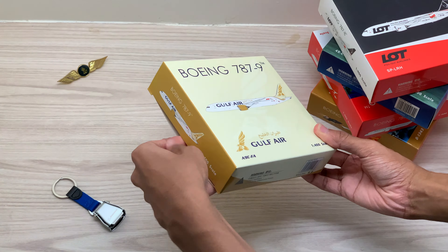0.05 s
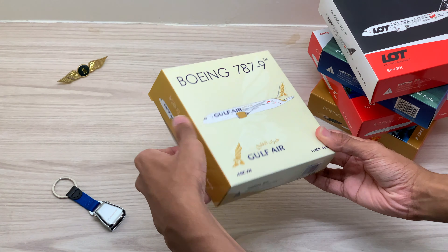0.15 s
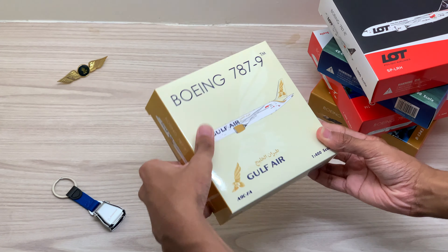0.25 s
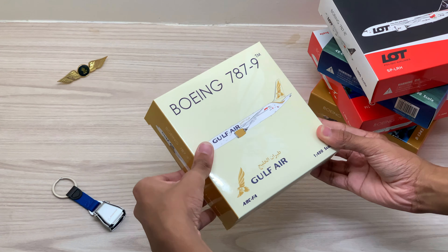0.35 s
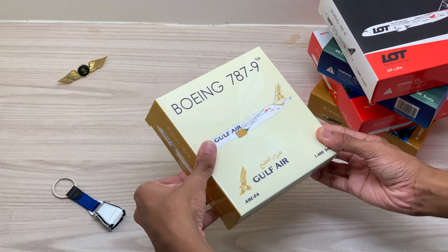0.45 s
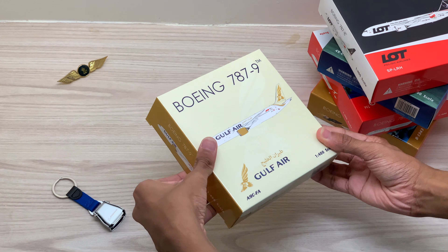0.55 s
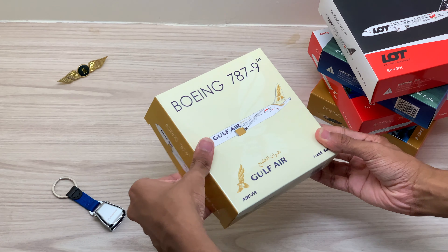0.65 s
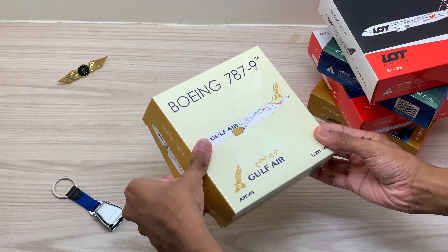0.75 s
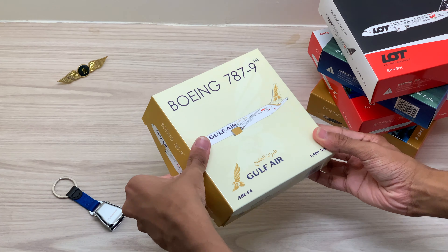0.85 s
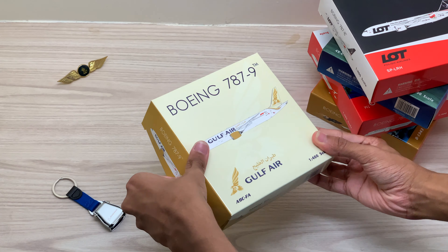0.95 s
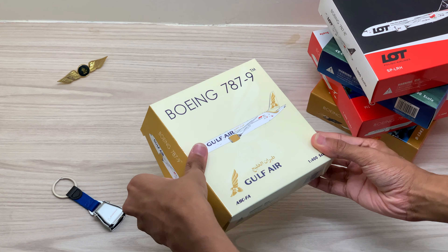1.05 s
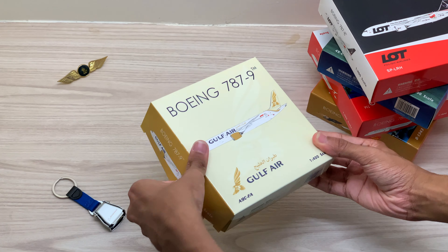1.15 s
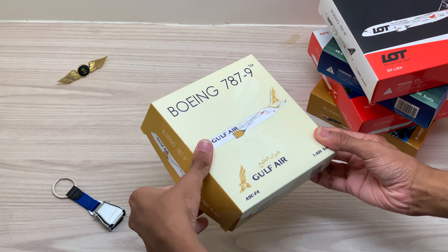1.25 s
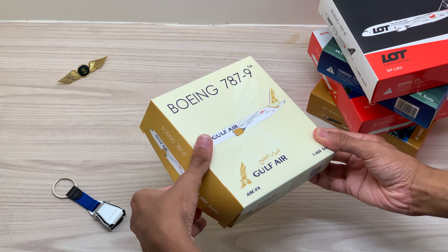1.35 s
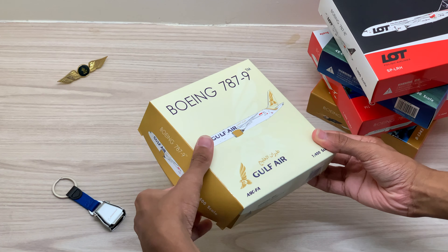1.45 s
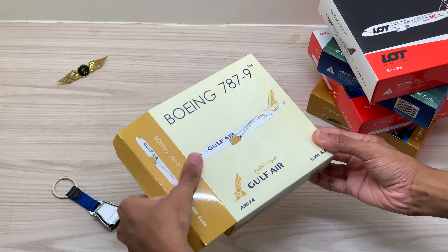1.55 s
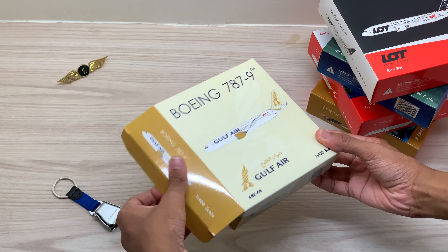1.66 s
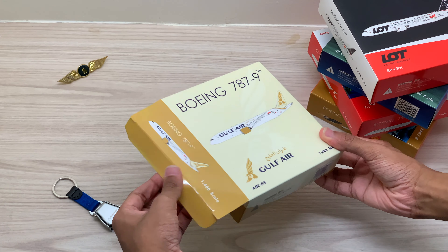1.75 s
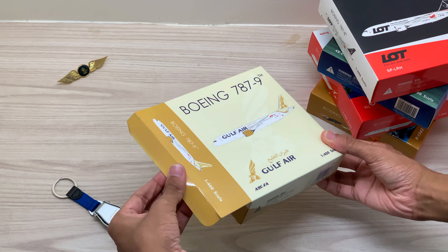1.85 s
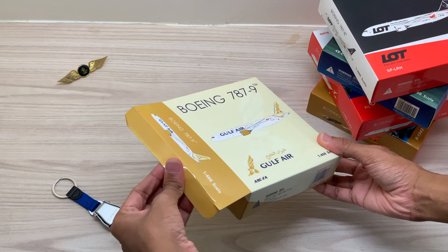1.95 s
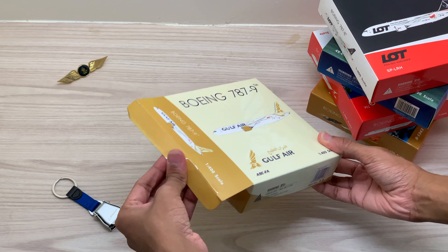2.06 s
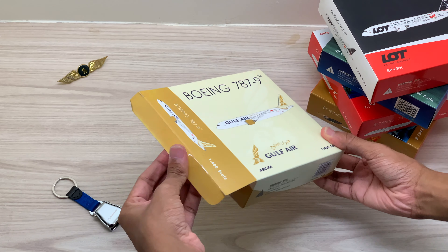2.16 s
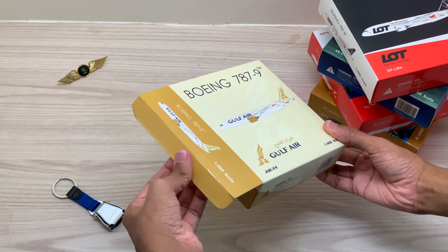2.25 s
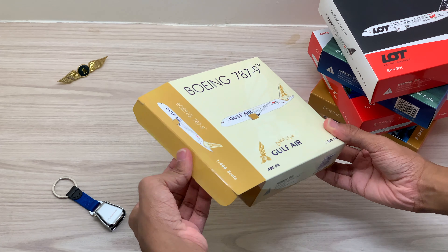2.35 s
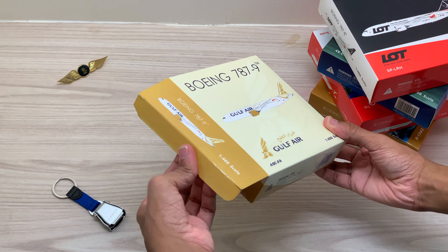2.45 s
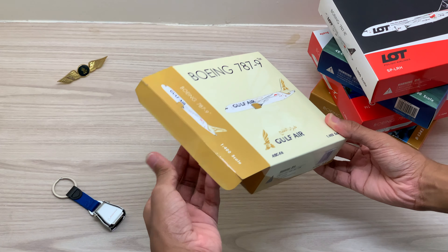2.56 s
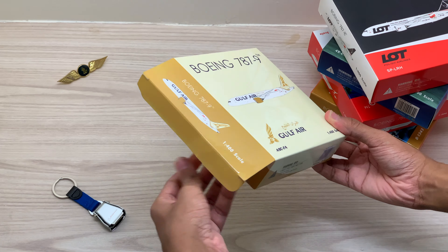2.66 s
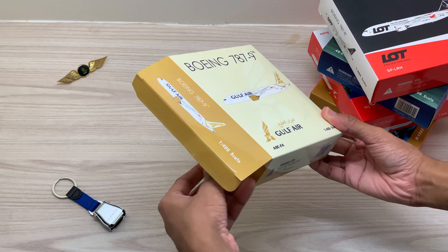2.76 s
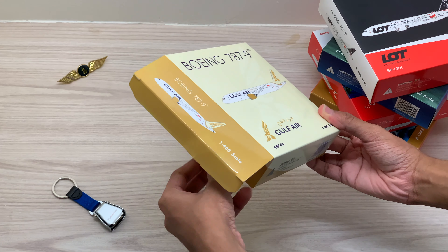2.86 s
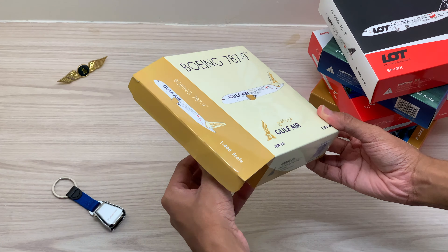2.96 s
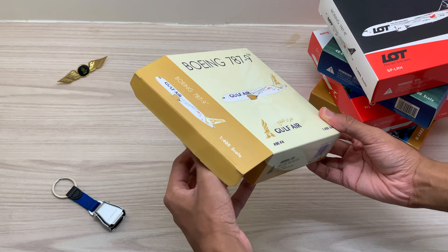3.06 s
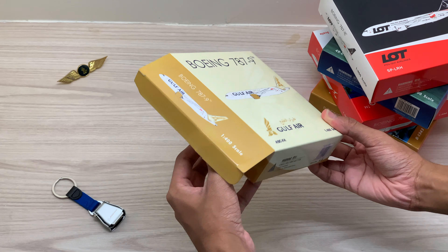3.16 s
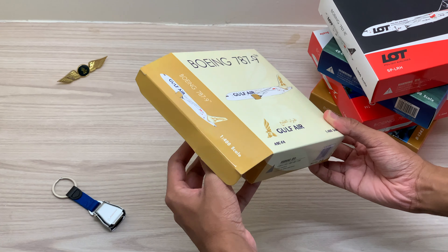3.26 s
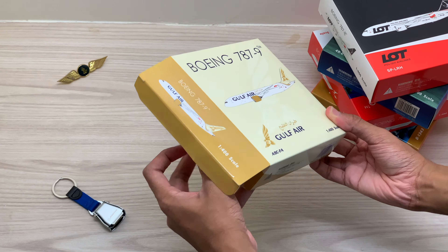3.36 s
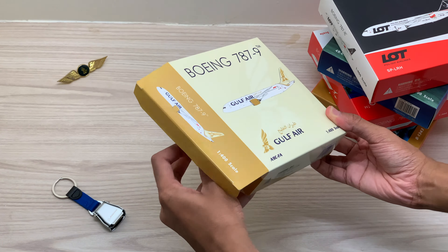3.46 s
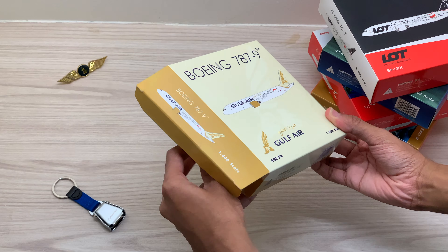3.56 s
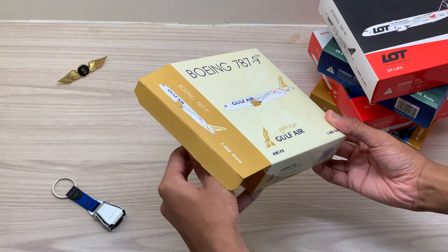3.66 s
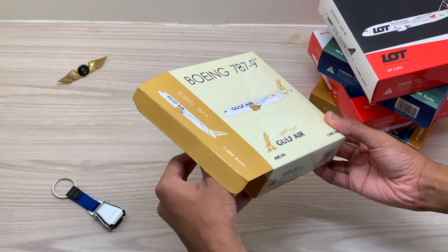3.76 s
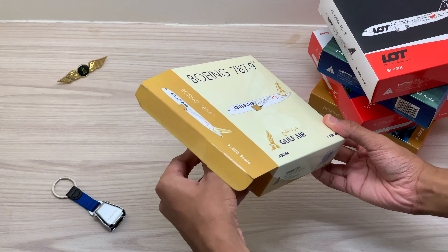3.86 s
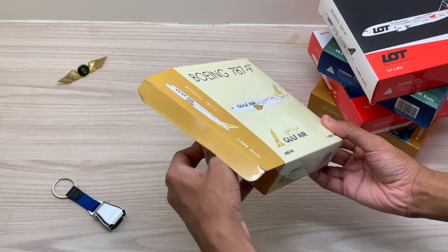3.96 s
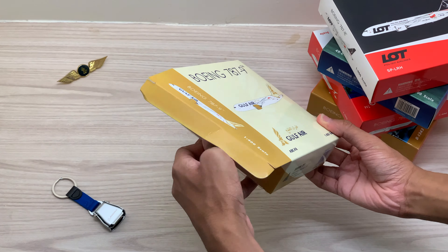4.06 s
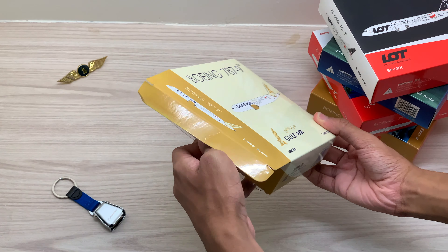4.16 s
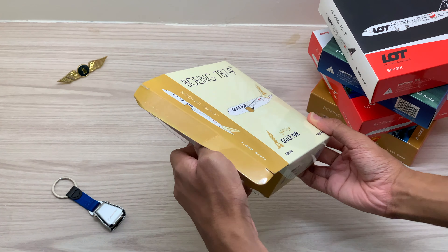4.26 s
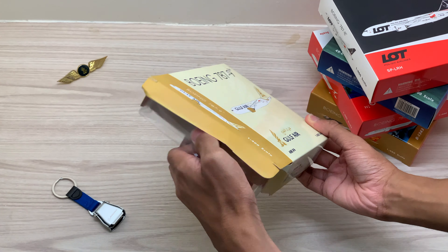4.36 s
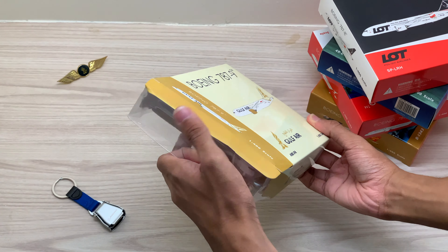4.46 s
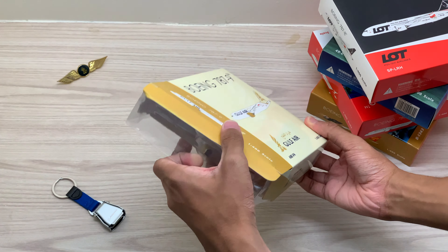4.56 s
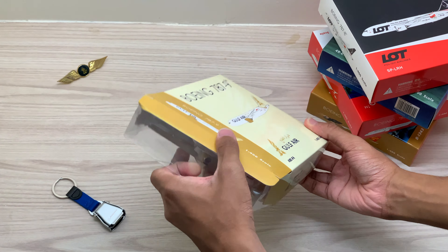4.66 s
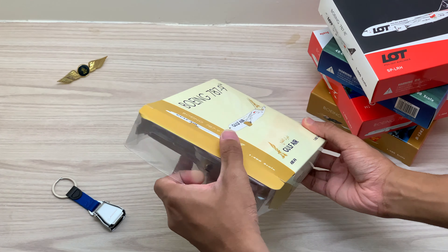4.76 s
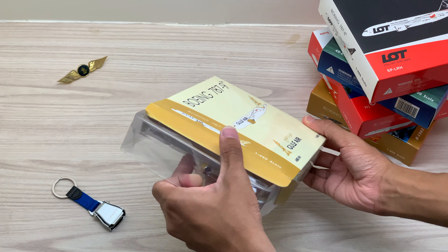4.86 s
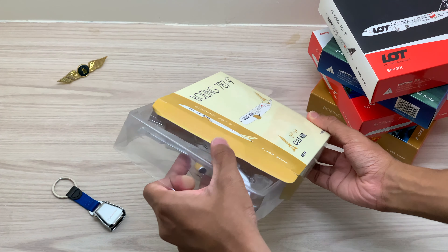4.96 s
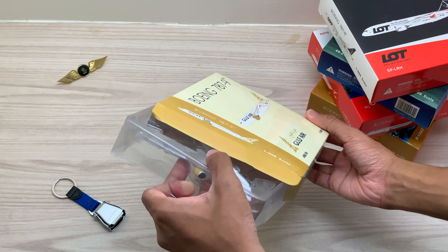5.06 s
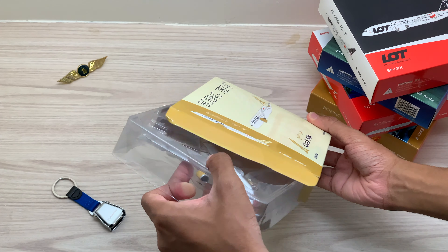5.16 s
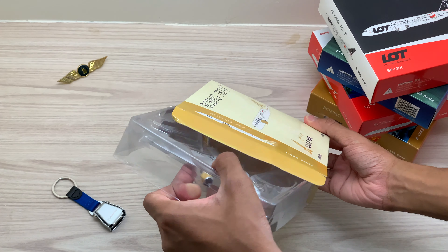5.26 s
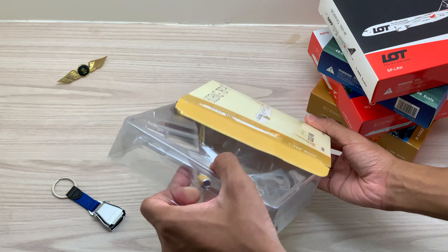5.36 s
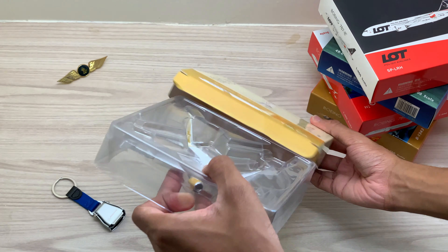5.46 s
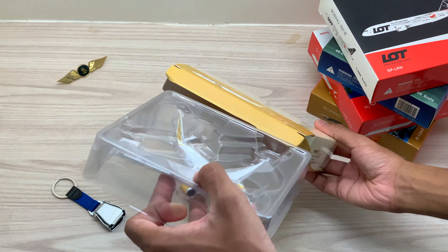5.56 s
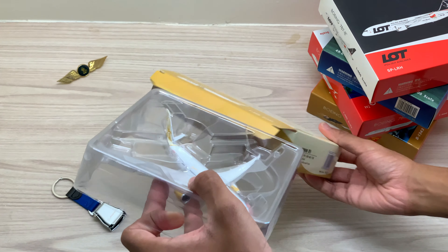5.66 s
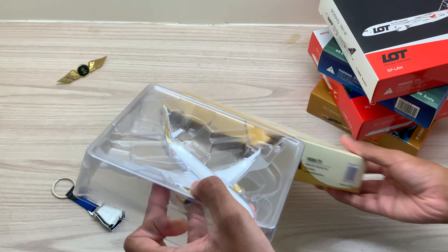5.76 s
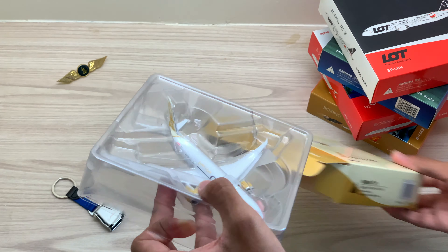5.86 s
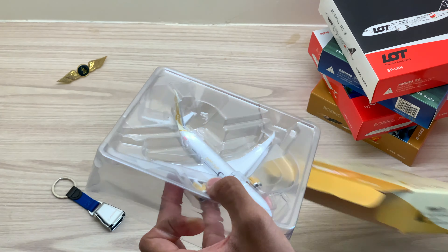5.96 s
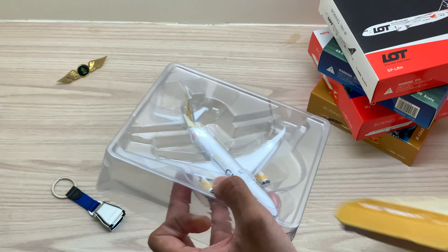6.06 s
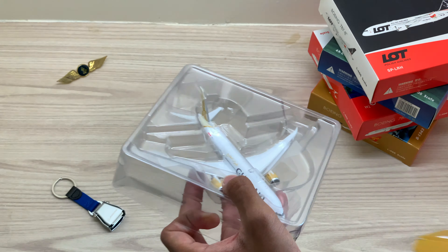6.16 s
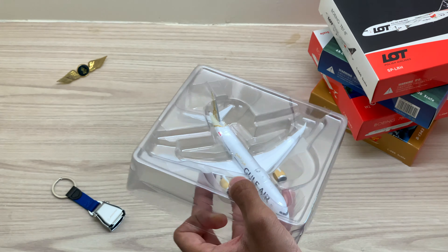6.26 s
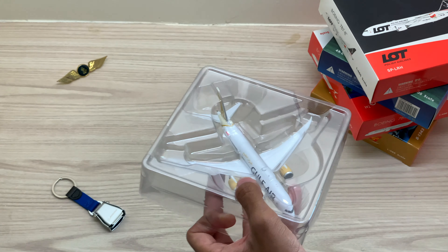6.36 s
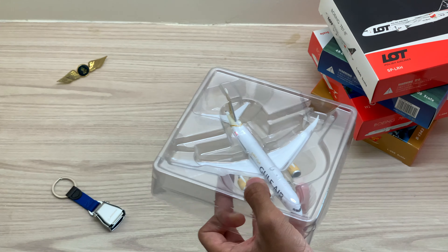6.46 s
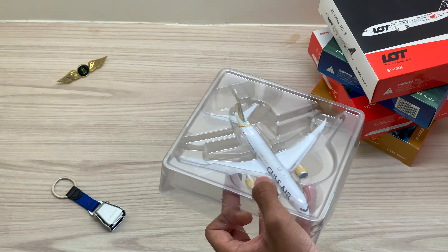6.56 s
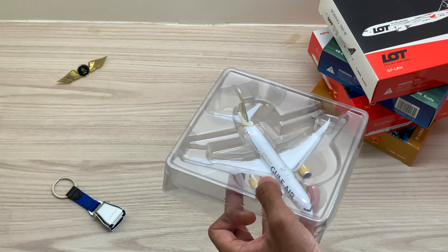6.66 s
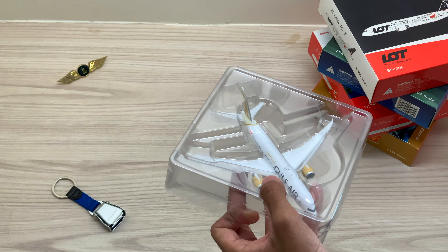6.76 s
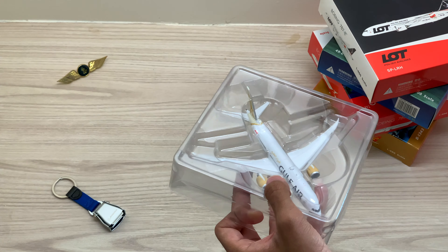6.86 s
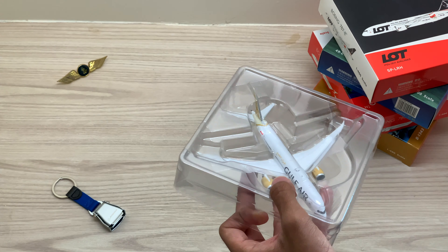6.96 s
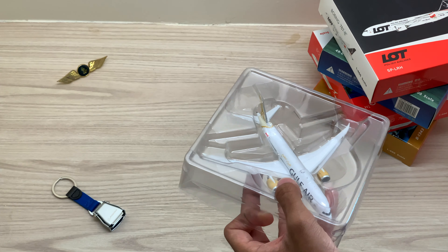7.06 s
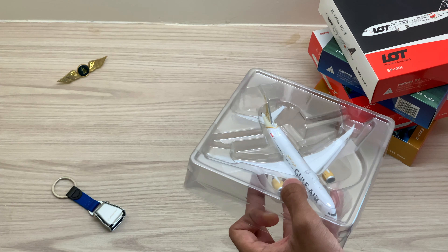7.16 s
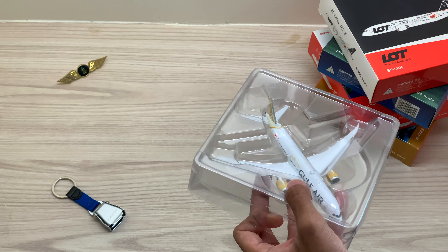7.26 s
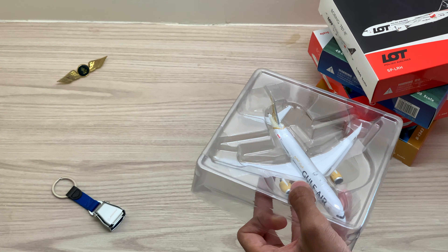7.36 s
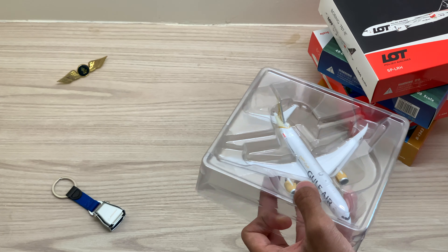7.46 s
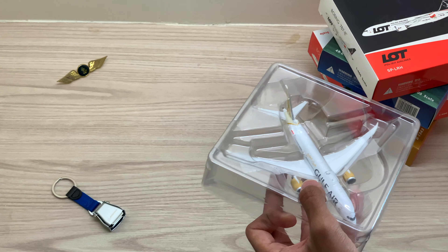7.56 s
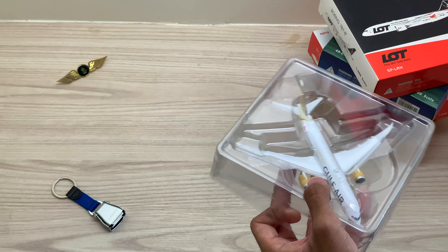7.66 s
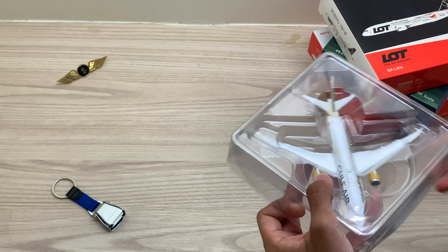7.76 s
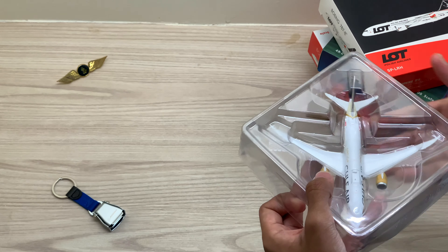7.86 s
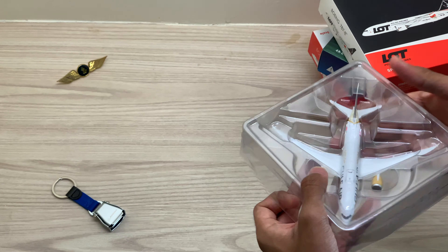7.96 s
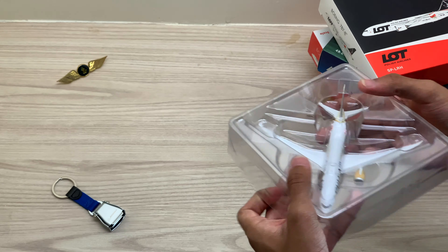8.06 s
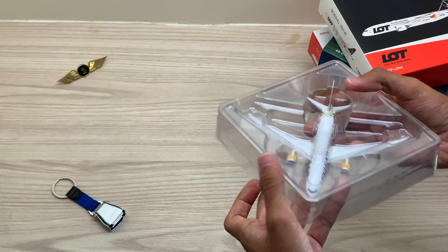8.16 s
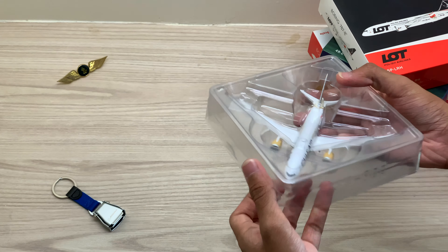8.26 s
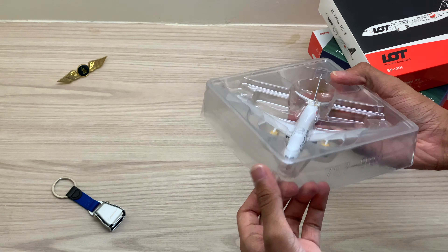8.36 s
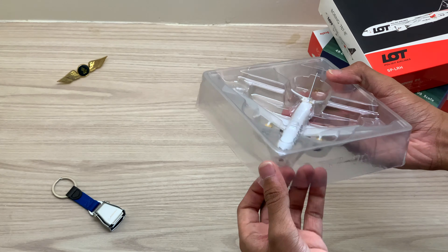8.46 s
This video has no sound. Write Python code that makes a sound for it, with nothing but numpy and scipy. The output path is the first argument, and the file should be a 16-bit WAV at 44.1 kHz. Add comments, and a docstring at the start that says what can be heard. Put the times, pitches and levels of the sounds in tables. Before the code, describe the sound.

Close handling of a card box: hollow thumps, scraping flaps and ticks, a short squeaky tray pull, a box clatter, then crackly plastic rustling.

```python
"""Cardboard box and plastic tray, close microphone

A box is turned in the hands, its flaps are prised open and a plastic tray is dragged out with a squeak.
The empty box is dropped aside and settles, then fingers shift on the crackling tray.
Rubs are stick-slip clicks through panel resonances; knocks are decaying panel modes with a shake of loose card.
Place: a small hard room, its air as coloured noise under a faint hum.
The close microphone overloads on the loudest knocks, made by clipping the peaks."""
import sys
import numpy as np
from scipy import signal
from scipy.io import wavfile
from scipy.ndimage import map_coordinates

SR = 44100
rng = np.random.default_rng(int(sys.argv[2]) if len(sys.argv) > 2 else 0)


def inscribe(sig):
    """Save sig as 16-bit PCM at rate SR to the path in sys.argv[1].

    A 1-D sig is mono; a 2-D sig holds one channel per row.
    Samples are clipped to [-1, 1] before scaling.
    """
    pcm = np.round(np.clip(np.atleast_2d(sig).T, -1, 1) * 32767)
    wavfile.write(sys.argv[1], SR, pcm.astype(np.int16))


N = 375732  # length in samples


def amp(db):
    """Decibels to gain."""
    return 10 ** (np.asarray(db) / 20)


def unit(x):
    """Scales to rms 1."""
    return x / np.sqrt(np.mean(x ** 2) + 1e-20)


def read(points, hz):
    """Reads a spectrum table on a log-frequency axis."""
    f, value = np.transpose(points)
    return np.interp(np.log(hz + 1), np.log(f + 1), value)


def follow(rows, t):
    """Reads every column of a curve at the times t."""
    s, *columns = np.transpose(rows)
    return [np.interp(t, s, c) for c in columns]


def add(mix, s, sound):
    """Mixes a sound in at time s."""
    part = mix[max(round(s * SR), 0):][:len(sound)]
    part += sound[:len(part)]


def colour(x, spectrum, size=2048):
    """Causal minimum-phase filter with the given spectrum."""
    hz = abs(np.fft.fftfreq(size, 1 / SR))
    log_gain = np.log(amp(np.maximum(read(spectrum, hz), -90)))
    taps = np.fft.ifft(np.exp(np.conj(signal.hilbert(log_gain)))).real
    return signal.fftconvolve(x, taps[:size // 2])[:len(x)]


def resonate(x, hz, width):
    """A resonance of gain 1 that may follow a curve: shift to 0 Hz, smooth, shift back."""
    turn = np.exp(2j * np.pi * np.cumsum(hz * np.ones(len(x))) / SR)
    r = np.exp(-np.pi * width / SR)
    return 2 * (turn * signal.lfilter([1 - r], [1, -r], x / turn)).real


def band(x, edges_hz, kind, order=3):
    """Butterworth filter."""
    return signal.sosfilt(signal.butter(order, edges_hz, kind, fs=SR, output="sos"), x)


def wander(n, per_s):
    """Smooth chance of rms about 1."""
    at = np.arange(n) * per_s / SR
    return map_coordinates(rng.standard_normal(8192), [at % 8191], order=1) * np.sqrt(3 / 2)


def slips(n, per_s, spread_db, hiss):
    """Tiny stick-slip clicks of uneven size over the hiss of fibres."""
    size = amp(spread_db * np.minimum(rng.exponential(1, n), 4)) * rng.choice([-1, 1], n)
    clicks = unit(size * (rng.random(n) < per_s / SR))
    return unit(clicks + hiss * rng.standard_normal(n))


# spectrum of the room air: freq_hz, level_db
AIR_SPECTRUM = [(15, -39), (25, -34.5), (49, -14.5), (164, -15.5), (209, 6.5), (289, -13.5), (537, 1.5),
                (782, -12.5), (1020, -3.5), (3630, -44.5), (5140, -46), (6050, -46.5), (15500, -39.5)]
# a low hum that comes and goes: time_s, level_db
HUM_LEVEL = [(4.2, -76), (5.5, -62.5), (5.8, -57), (6.7, -50.5), (6.9, -58), (7.9, -67), (8.5, -46.5)]


def background(air_db=-46, apart=0.68, hum_hz=58.7):
    """Steady room air, partly different at each ear, and a low hum of wavering pitch."""
    t = np.arange(N) / SR
    shared, left, right = (unit(colour(x, AIR_SPECTRUM, size=8192)) for x in rng.standard_normal((3, N)))
    sides = band(np.array([left, right]), 250, "high", order=1)
    air = unit(shared + apart * sides) * amp(air_db)
    hum = np.sin(2 * np.pi * np.cumsum(hum_hz + 1.5 * wander(N, per_s=12)) / SR)
    fade_in = np.clip(t - HUM_LEVEL[0][0], 0, 1)
    return band(air, 10500, "low", order=3) + hum * amp(follow(HUM_LEVEL, t)[0]) * fade_in


# how long the room rings: freq_hz, t60_s
ROOM_T60 = [(120, 0.12), (500, 0.2), (3500, 0.27), (15000, 0.12)]


def room(x, wet_db=-7.5, early_db=-1.5):
    """Quick reflections from table and boxes, then a short tail, different at each ear; deep bass passes by."""
    taps = rng.choice([-1., 1.], (2, SR // 2)) * (rng.random((2, SR // 2)) < 4000 / SR)
    hz, t, z = signal.stft(taps, SR, nperseg=256)
    tail = signal.istft(z * amp(-60 * t / read(ROOM_T60, hz)[:, None]), SR, nperseg=256)[1]
    t = np.arange(tail.shape[1]) / SR
    early = rng.standard_normal(tail.shape) * np.exp(-t / 0.004) * (t > .001)
    tail = tail * np.minimum(t / 0.0086, 1)
    layers = [(wet_db, tail), (early_db, early)]
    echo = sum(amp(db) * e / np.linalg.norm(e, axis=1, keepdims=True) for db, e in layers)
    return signal.fftconvolve(x[None], band(echo, 380, "high", order=2), axes=1)[:, :N]


def moving_room(x, count=3, shifts_per_s=2.0):
    """The reflections change as the hands move things about: a few versions of the room take turns."""
    turn = 2 * np.pi * shifts_per_s * np.arange(N) / SR / count
    shares = np.array([np.maximum(np.cos(turn - 2 * np.pi * k / count), 0) for k in range(count)])
    return sum(room(x * share) for share in shares / np.linalg.norm(shares, axis=0))


# dull rustle of the hands on the walls: time_s, level_db
HAND_LEVEL = [(0, -33.5), (0.35, -63), (1.2, -38.5), (1.75, -46), (1.97, -38), (2.45, -50.5), (3.0, -36.5),
              (3.75, -40), (4.2, -46), (6.8, -49.5), (7.25, -34.5), (7.9, -51), (8.5, -39.5)]
# spectrum of skin on card: freq_hz, level_db
SKIN_SPECTRUM = [(30, -44), (80, -6), (130, -7), (220, -3), (500, -2), (1200, -13.5), (5000, -27.5)]


def hands(lumps_db=3.0, top_hz=3000):
    """Skin creeping on the walls: dense dull slips, in uneven pushes."""
    grains = slips(N, per_s=200, spread_db=-0.5, hiss=0.74)
    creep = unit(band(colour(grains, SKIN_SPECTRUM, size=4096), top_hz, "low"))
    return creep * amp(follow(HAND_LEVEL, np.arange(N) / SR)[0] + lumps_db * wander(N, per_s=25))


# air pushed out by the box walls: start_s, level_db
PUFFS = [(0.237, -49), (0.729, -31), (1.358, -28), (1.53, -15), (1.568, -25), (4.022, -39), (4.418, -57)]


def puffs():
    """Air pushed by a wall booms low: two decaying tones with a soft start."""
    out, t = np.zeros(N), np.arange(SR // 3) / SR
    low = np.sin(2 * np.pi * 123 * t) * np.exp(-t / 0.047)
    high = 1.264 * np.sin(2 * np.pi * 218 * t) * np.exp(-t / 0.039)
    boom = (low + high) * (1 - np.exp(-t / 0.011))
    for s, db in PUFFS:
        add(out, s, amp(db) * boom)
    return out


BODY_HZ, FIZZ_HZ, SHEEN_HZ = 700, 2500, 7000  # borders between hollow, middle, fizz and sheen


def stroke(s, db, hollow, fizz, sheen, ring_hz, rise, decay, material, grain_db, sharpness,
           glide_octaves=0, gain_db=-1.5, ring=0.7, ribs=0.64, judder_db=2.6):
    """One surface slides over another: stick-slip clicks swell and fade, radiated by a flexing panel."""
    rise, decay = max(rise, .001), max(decay, .002)
    t = np.arange(-3.5 * rise, 3.5 * decay, 1 / SR)  # the peak is at 0
    swell = np.exp(-abs(t / np.where(t < 0, rise, decay)) ** 1.33)
    judder = amp(judder_db * wander(len(t), per_s=160))
    drive = slips(len(t), per_s=1300, spread_db=grain_db, hiss=0.63) * judder
    x = unit(colour(np.pad(swell * drive, (0, SR // 30)), material))  # padded for the ringing
    flex = 1 + 0.016 * wander(len(x), per_s=25)  # bending shifts every resonance
    # the free part of the panel changes in length
    glide = 2 ** (glide_octaves * np.tanh((t[0] + np.arange(len(x)) / SR) / rise))
    panel = unit(resonate(x, ring_hz * flex * glide, width=ring_hz / sharpness))
    # the travelling contact wakes one stiff fold or rib after another
    folds = sum(resonate(x, hz * flex, width=160) * amp(5.7 * wander(len(x), per_s=45))
                for hz in rng.uniform(1437, 4610, 6))
    x = x + ring * panel + ribs * unit(folds)
    # a soft broad contact moves the whole wall; a sharp edge gives fizz and sheen
    parts = [(hollow, band(x, BODY_HZ, "low", order=4)),
             (0, band(x, [BODY_HZ, FIZZ_HZ], "band", order=4)),
             (fizz, band(x, [FIZZ_HZ, SHEEN_HZ], "band", order=6)),
             (sheen, band(x, SHEEN_HZ, "high", order=4))]
    sound = sum(amp(part_db) * part / np.linalg.norm(part) for part_db, part in parts)
    return s + t[0], amp(db + gain_db) * np.linalg.norm(swell) * sound


# Every contact has an edge: 0 dB is usual for its kind, more is a sharper, brighter touch, less a softer one.
HOLLOW_PER_EDGE = -0.051  # dB of wall boom for each dB of edge
# a stroke shorter than this only catches: it never slides fast enough for full sheen
CATCH_S, CATCH_DULL_DB = 0.03, 14


def contacts(rows, material, hollow_db, fizz_db, sheen_db, rise_share, grain_db, sharpness, glide_octaves=0):
    """Strokes of one kind share shape and tone; edge tilts each from hollow to bright, length adds sheen."""
    out, rise_share = np.zeros(N), np.clip(rise_share, .02, .9)
    for s, db, edge, length, ring_hz in rows:
        hollow = hollow_db + HOLLOW_PER_EDGE * edge
        sheen = sheen_db + edge - CATCH_DULL_DB * np.exp(-length / CATCH_S)
        rise, decay = rise_share * length, (1 - rise_share) * length
        add(out, *stroke(s, db, hollow, fizz_db + edge, sheen, ring_hz, rise, decay,
                         material, grain_db, sharpness, glide_octaves))
    return out


# spectrum of rubbed card, also used by the knocks, tray pulls and box: freq_hz, level_db
CARD_SPECTRUM = [(59, -55.5), (100, -24.5), (386, -10), (477, 0.5), (668, 0.5), (727, -3.5), (1290, -4.5),
                 (1400, -6.5), (1730, -8), (7250, -22), (8950, -18), (11300, -27.5), (13400, -25),
                 (15500, -38)]
# one smooth face sticking on another: peak_s, level_db (before the stroke gain), resonance_hz
CHIRPS = [(0.509, -33, 3940), (0.592, -32.5, 4060), (0.645, -34, 3600), (1.008, -26, 2300),
          (1.895, -49, 2830), (2.164, -45.5, 3800), (4.696, -31.5, 2687), (6.245, -50.5, 5020)]


def chirps(rise_s=0.003, decay_s=0.0093):
    """A short catch that rings at one high resonance and has almost no sheen."""
    out = np.zeros(N)
    for s, db, hz in CHIRPS:
        add(out, *stroke(s, db, hollow=-16.5, fizz=1.2, sheen=-21, ring_hz=hz, rise=rise_s, decay=decay_s,
                         material=CARD_SPECTRUM, grain_db=2.5, sharpness=16, ring=1.5))
    return out


def knocks(rows, modes, gain_db, reach, rattle):
    """Each blow rings the panel modes near its centre and shakes the loose card."""
    out, t = np.zeros(N), np.arange(SR // 4) / SR
    hz, width, mode_db = np.transpose(modes)[:, :, None]
    for s, db, centre_hz in rows:
        weight = amp(mode_db) / (1 + (np.log2(hz / centre_hz) / reach) ** 2)  # reach in octaves
        grip = 1 + 0.0065 * rng.standard_normal(hz.shape)  # the hold on the box detunes its panels
        tones = np.sin(2 * np.pi * (hz * grip * t + rng.random(hz.shape)))
        ring = (weight * tones * np.exp(-np.pi * width * t)).sum(0)
        shake = rng.standard_normal(len(t)) * np.exp(-t / 0.0055)
        loose = band(colour(shake, CARD_SPECTRUM), 1500, "low")
        hit = (unit(ring) + rattle * unit(loose)) * (1 - np.exp(-t / 0.0045))
        add(out, s, amp(db + gain_db) * hit / abs(hit).max())
    return out


# the empty box landing and tipping over: start_s, peak_db (before gain), centre_hz
EMPTY_KNOCKS = [(6.412, -2, 460), (6.426, -7, 468), (6.446, -1, 441), (6.458, -3, 435), (6.486, -10.5, 409),
                (6.88, 1, 705), (6.886, -5, 436)]
# panel modes of the empty box: freq_hz, width_hz, level_db
EMPTY_MODES = [(369, 18, -3.5), (408, 17, 0), (455, 17.4, 2.5), (526, 20, -3.5), (587, 24, -7.5),
               (678, 42, 3.5), (763, 44, -7), (960, 32, -19.5), (1398, 35, -19), (1530, 31, -13)]


def empty_box_knocks():
    """The empty box is dropped aside and settles: its panels ring with little rattle."""
    return knocks(EMPTY_KNOCKS, EMPTY_MODES, gain_db=-2.5, reach=0.53, rattle=0.15)


# blows on the full box: start_s, peak_db (before gain), centre_hz
FULL_KNOCKS = [(0.178, 1, 653), (0.185, -1, 697), (0.202, 1, 520), (0.212, 2, 735), (0.218, 2, 546),
               (0.233, 4, 490), (0.241, 2, 775), (0.253, -28, 463), (1.522, 2.5, 500), (1.536, 2, 525),
               (1.551, -0.5, 570), (4.021, 5.5, 564), (4.03, -1.5, 496)]
# panel modes of the full box: freq_hz, width_hz, level_db
FULL_MODES = [(373, 105, -16), (447.4, 15, -1), (493, 36.6, 5), (551, 26, 0.5), (594, 62, -5.5),
              (659, 16, -1.5), (787, 33, 0.5), (880, 58, 0.5), (1080, 68, 2), (1328, 40, -11.5)]


def full_box_knocks():
    """Blows on the full box ring its panels, with more rattle of loose card."""
    return knocks(FULL_KNOCKS, FULL_MODES, gain_db=-2.0, reach=0.524, rattle=0.46)


# the tray squeaking on the card: time_s, pitch_hz, level_db
SQUEAK = [(4.885, 898, -27.5), (4.898, 870, -9), (4.918, 866.7, -10), (4.932, 851.6, -16.5),
          (4.96, 813, -15.5), (4.99, 825, -20.5), (5.03, 851, -32.5), (5.102, 845, -45.5)]
# one value for each harmonic, from the first up: level_db
SQUEAK_PARTIALS = [0.5, 3, -14, -13.5, -20]


def squeak(jitter=0.023, flutter_db=3.0):
    """The slips lock into a rough pitch while the tray is gripped tightly by the box."""
    t = np.arange(SQUEAK[0][0], SQUEAK[-1][0], 1 / SR)
    hz, level = follow(SQUEAK, t)
    turns = np.cumsum(hz * (1 + jitter * wander(len(t), per_s=600))) / SR
    tone = np.zeros(len(t))
    for harmonic, db in enumerate(SQUEAK_PARTIALS, start=1):
        flutter = amp(db + flutter_db * wander(len(t), per_s=100))
        tone += flutter * np.sin(2 * np.pi * harmonic * turns)
    return t[0], unit(tone) * amp(level)


# Tray tables: levels are before the stroke gain.
# spectrum of thin plastic: freq_hz, level_db
PLASTIC_SPECTRUM = [(120, -47.5), (200, -20), (596, -16), (874, -6.5), (1400, -4), (1680, -1), (3180, -9.5),
                    (9480, -15.5), (11400, -23), (13600, -21), (15500, -35)]
# pulls that slide the tray out of the box: peak_s, level_db, edge_db, length_s, resonance_hz (at the peak)
PULLS = [(4.372, -11.5, -1.5, 0.13, 1195), (4.575, -25.5, -2, 0.062, 1290), (4.868, -11, 0.5, 0.115, 1407),
         (4.945, -16, 1, 0.04, 1700), (5.362, -9, 0, 0.05, 1750), (5.42, -15, -4.5, 0.075, 940)]
# fingers shifting on the bare tray: peak_s, level_db, edge_db, length_s, resonance_hz (of the shell)
TRAY_RUBS = [(6.93, -25, -3.5, 0.033, 1800), (6.99, -27.5, -1, 0.051, 1450),
             (7.165, -20, -3.5, 0.056, 1400), (7.215, -38, 7, 0.041, 1477), (7.397, -37, -1.5, 0.04, 1476),
             (7.525, -50.5, 4.5, 0.04, 1476), (8.03, -26.5, -3.5, 0.035, 1700), (8.09, -25, 3, 0.039, 1604),
             (8.187, -15, -2.5, 0.05, 1080), (8.314, -23.5, 10, 0.05, 2100),
             (8.376, -25.5, -10, 0.075, 1740), (8.44, -16.5, -5, 0.028, 1700)]
# the thin plastic buckling: peak_s, level_db, edge_db, resonance_hz (of the shell)
TRAY_CLICKS = [(7.269, -22, 0, 1440), (8, -10, -16.5, 1525), (8.123, -17.5, 2.5, 1670),
               (8.138, -11.5, -2, 1500), (8.173, -17, -5, 1140), (8.223, -21, -26, 1120),
               (8.307, -13.5, -0.5, 2160), (8.5, -11, -9.5, 1710)]


def tray(click_s=0.008):
    """The tray drags along the card, each pull sinking in tone, and squeaks; then fingers rustle and click it."""
    out = contacts(PULLS, CARD_SPECTRUM, hollow_db=-15.5, fizz_db=-8, sheen_db=-7,
                   rise_share=0.48, grain_db=1.5, sharpness=13, glide_octaves=-0.7)
    add(out, *squeak())
    out += contacts(TRAY_RUBS, PLASTIC_SPECTRUM, hollow_db=-7.5, fizz_db=-9.5, sheen_db=-10.5,
                    rise_share=0.38, grain_db=5.0, sharpness=3.4)
    clicks = [(s, db, edge, click_s, hz) for s, db, edge, hz in TRAY_CLICKS]
    out += contacts(clicks, PLASTIC_SPECTRUM, hollow_db=-26, fizz_db=-6.0, sheen_db=-8,
                    rise_share=0.1697, grain_db=6.0, sharpness=10)
    return out


# Box tables: levels are before the stroke gain.
# fingers and flaps rubbing broadly on the box wall: peak_s, level_db, edge_db, length_s
RUBS = [(0.178, -19, 3, 0.026), (0.233, -20, 0.5, 0.032), (0.659, -27.5, -21, 0.046),
        (0.732, -9.5, 4, 0.053), (0.921, -25, -3.5, 0.093), (1.055, -24.5, -7, 0.055),
        (1.154, -18, -5, 0.042), (1.217, -21.5, -3, 0.057), (1.36, -14, 0, 0.054), (1.432, -22, 2, 0.031),
        (1.53, -13, 1, 0.043), (1.591, -22, -7, 0.052), (1.813, -52, 14.5, 0.039),
        (1.901, -40.5, -5, 0.017), (2.011, -29, 2, 0.026), (2.719, -25, 5.5, 0.031), (2.81, -33, 3, 0.058),
        (3.112, -24, 5, 0.033), (3.212, -36, 8, 0.035), (3.631, -22, -2.5, 0.037),
        (3.965, -16.5, -1.5, 0.029), (4.002, -17, -5.5, 0.028), (4.101, -20, 8.5, 0.054),
        (4.408, -11, -0.5, 0.048), (5.155, -35, 10, 0.1), (5.303, -34, 9.5, 0.054),
        (5.453, -14.5, 1.5, 0.032), (6.429, -10, -6, 0.04), (6.887, -10.5, -18, 0.011)]
# a flap's edge scraping and catching: peak_s, level_db, edge_db, length_s, resonance_hz (of the flap)
SCRAPES = [(0.78, -14, -9.5, 0.077, 1146), (1.17, -30, -10, 0.044, 2200), (1.31, -27, 3.5, 0.069, 3670),
           (2.2, -32.5, -2, 0.025, 2088), (2.557, -25.5, 9.5, 0.02, 2030), (2.97, -16, -13, 0.026, 1460),
           (3.044, -21.5, -3, 0.024, 1480), (3.065, -34, 6.5, 0.042, 1450), (3.31, -19, -1, 0.033, 2156),
           (3.365, -33, 12.5, 0.061, 3530), (3.482, -19, -22, 0.04, 1810), (3.585, -9.5, -10, 0.03, 1300),
           (3.81, -20, -2, 0.075, 1846), (4.088, -10, -18, 0.024, 1320), (4.775, -16.5, -0.5, 0.023, 1260),
           (4.82, -11, -12, 0.03, 1260)]
# ticks as a crease of the card lets go: peak_s, level_db, edge_db, resonance_hz
TICKS = [(0.327, -39.5, -2, 4440), (0.705, -9.5, 0.5, 1196), (1.381, -22.5, 6.5, 1950),
         (2.012, -23, -14, 1900), (1.522, -12.5, 0.5, 1320), (1.998, -24, -4, 1800), (2.191, -29, 4, 1970),
         (2.554, -21, 13.5, 2200), (2.799, -39, 10, 2100), (3.031, -21.5, -3.5, 1452),
         (3.449, -20.5, -4.5, 1880), (3.472, -12.5, -16, 1830), (3.579, -17, 2.5, 1310),
         (3.794, -27, -3, 1790), (3.969, -11.5, -15.5, 1420), (4.023, -9, -11.5, 600),
         (4.086, -13, -17, 1300), (4.795, -11, -4.5, 1190), (5.097, -49.5, 11.5, 2600),
         (4.817, -8, -8.5, 1247), (5.319, -16, 1.5, 2680), (5.349, -8.5, -2, 2522), (6.396, -26, 0.5, 1500),
         (6.883, -12.5, -29, 726)]
# the panel resonance under a rub; a sharper touch wakes a higher one
WALL_HZ, WALL_OCTAVES_PER_EDGE = 715, 0.13


def box(tick_s=0.0058, wall_scatter=0.18):
    """The card box: hollow rubs on its wall, thinner scrapes of the flaps, ticking creases and puffs of air."""
    rubs = []
    for s, db, edge, length in RUBS:
        octaves = WALL_OCTAVES_PER_EDGE * max(edge, 0) + rng.normal(0, wall_scatter)
        rubs.append((s, db, edge, length, WALL_HZ * 2 ** octaves))
    out = contacts(rubs, CARD_SPECTRUM, hollow_db=-2, fizz_db=-9, sheen_db=-10,
                   rise_share=0.36, grain_db=3.5, sharpness=7)
    out += contacts(SCRAPES, CARD_SPECTRUM, hollow_db=-15.5, fizz_db=-4.0, sheen_db=-8.0,
                    rise_share=0.38, grain_db=3.5, sharpness=37)
    ticks = [(s, db, edge, tick_s, hz) for s, db, edge, hz in TICKS]
    out += contacts(ticks, CARD_SPECTRUM, hollow_db=-11.5, fizz_db=-3.5, sheen_db=1.5,
                    rise_share=0.17, grain_db=6.5, sharpness=16)
    return out + puffs()


# where the handling is: time_s, left_minus_right_db, left_lag_samples
PLACE = [(0.2, 0.8, -2.5), (1.2, 0.5, -2), (1.6, 0.5, 0.5), (2.2, 1.5, -1), (4.3, 1.5, -1), (5.2, 2, -2),
         (6.4, -0.5, -1.5), (6.9, 2.5, 11.5), (8.3, 1.5, 3)]


def scene(direct_db=-2.5):
    """All the handling, placed before the microphones in the room."""
    dry = hands() + chirps() + empty_box_knocks() + full_box_knocks() + tray() + box()
    n = np.arange(N)
    balance_db, lag = follow(PLACE, n / SR)
    direct = np.array([map_coordinates(dry, [n - lag], order=3), dry])
    balance = amp([balance_db / 2, -balance_db / 2])
    return (amp(direct_db) * direct + moving_room(dry)) * balance + background()


def record(dry):
    """A narrow dip in the top treble, then loud peaks clip, then the low-pass."""
    b, a = signal.iirnotch(11400, 7, SR)
    clipped = np.clip(signal.lfilter(b, a, dry), -1, 1)
    low_pass = signal.firwin(255, 15500, window=("kaiser", 8), fs=SR)
    return signal.oaconvolve(clipped, low_pass[None], "same")


dry = scene()
out = record(dry)
inscribe(out)
```